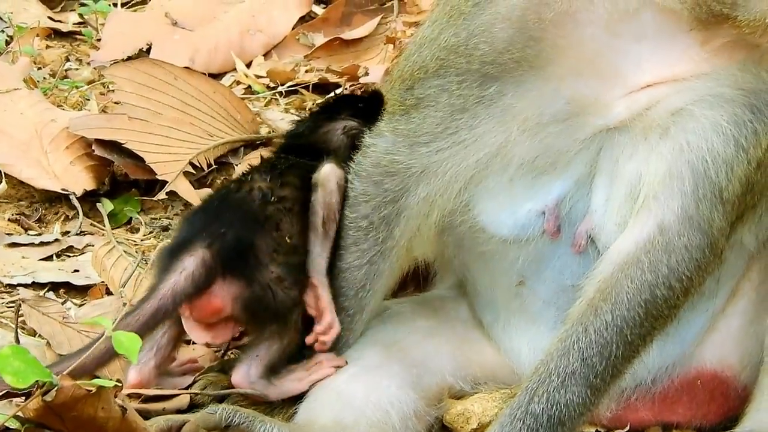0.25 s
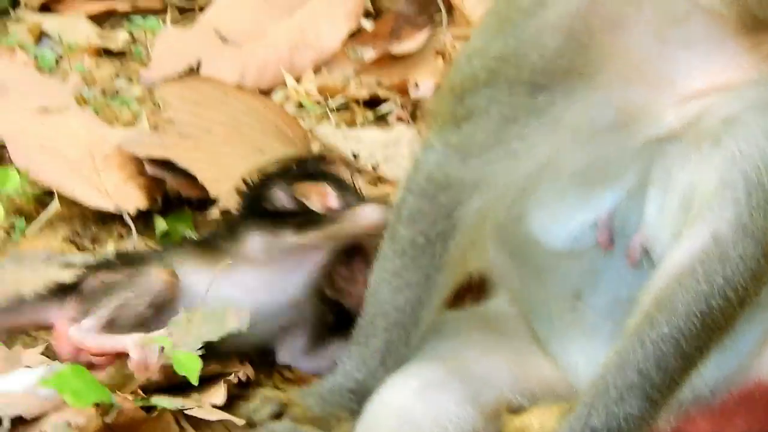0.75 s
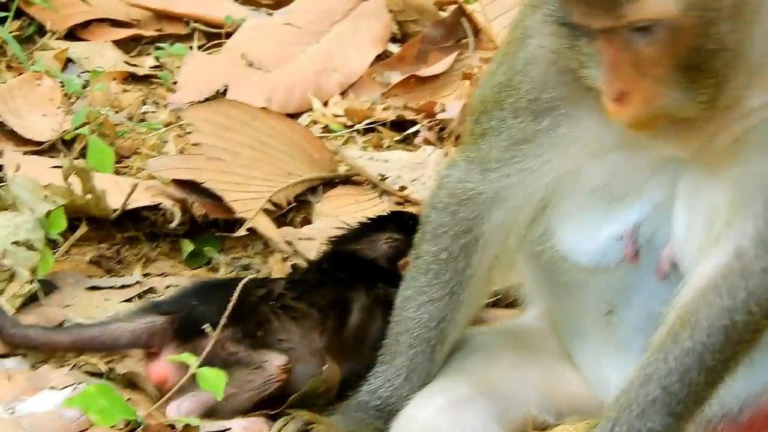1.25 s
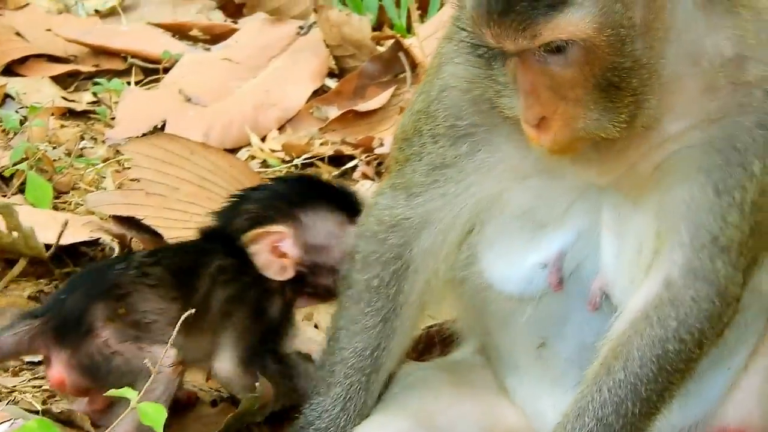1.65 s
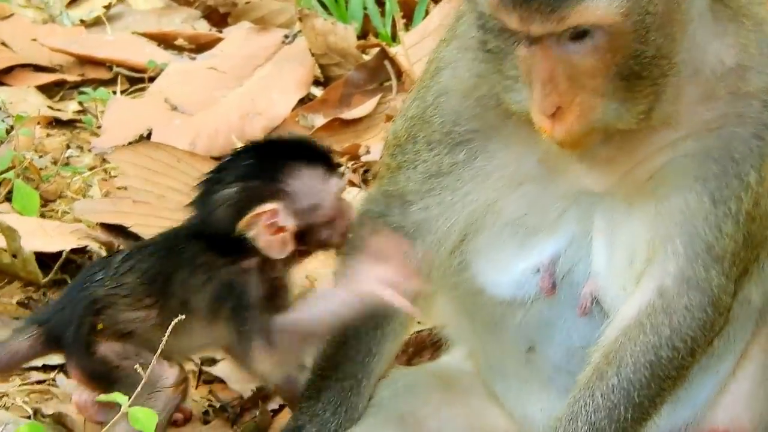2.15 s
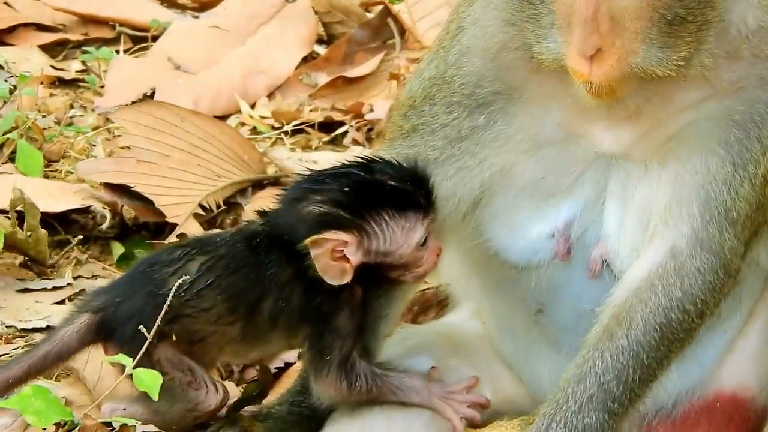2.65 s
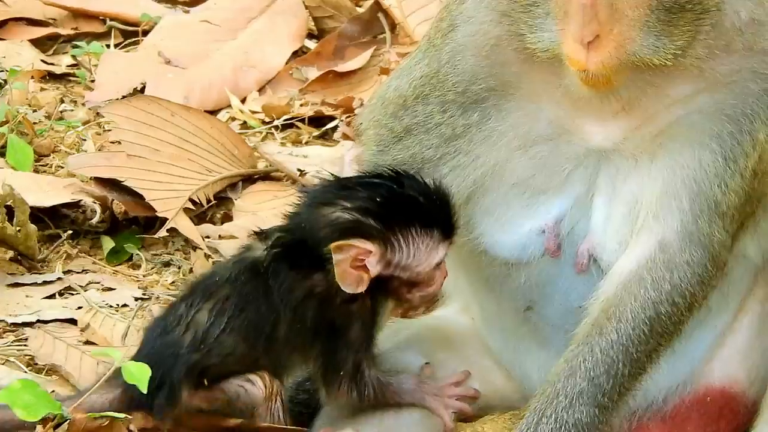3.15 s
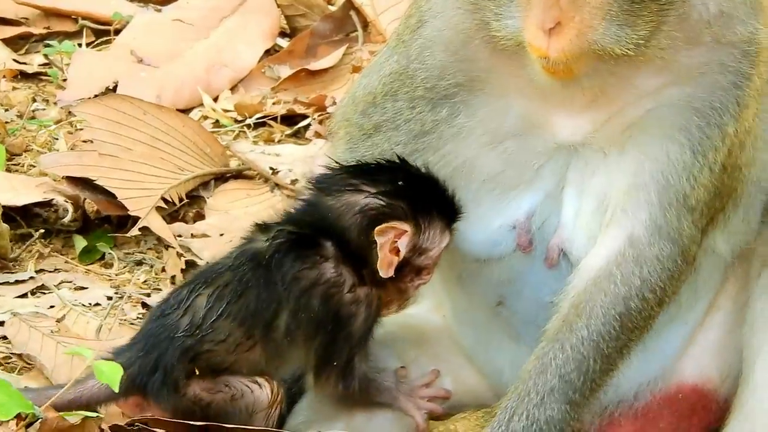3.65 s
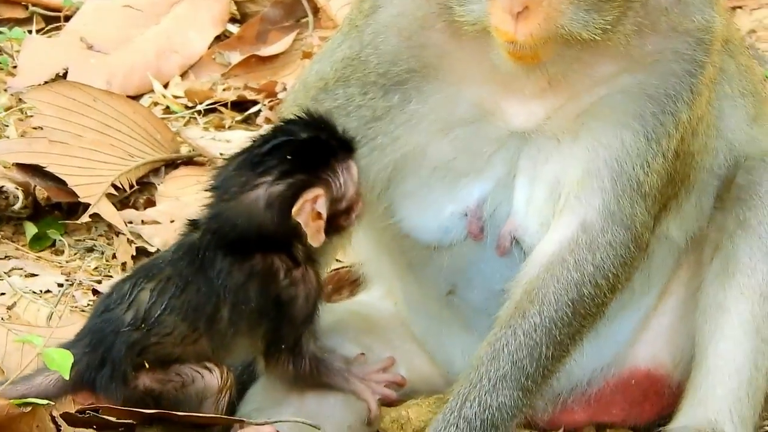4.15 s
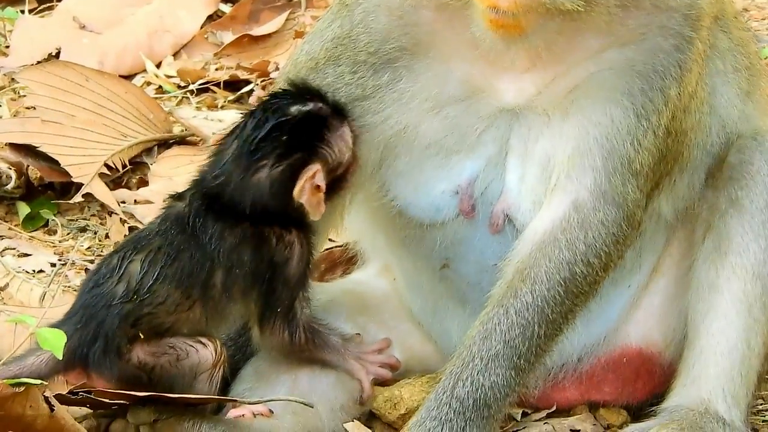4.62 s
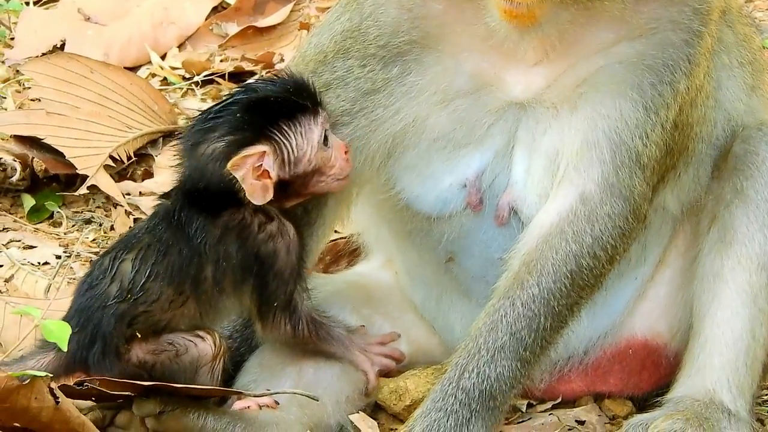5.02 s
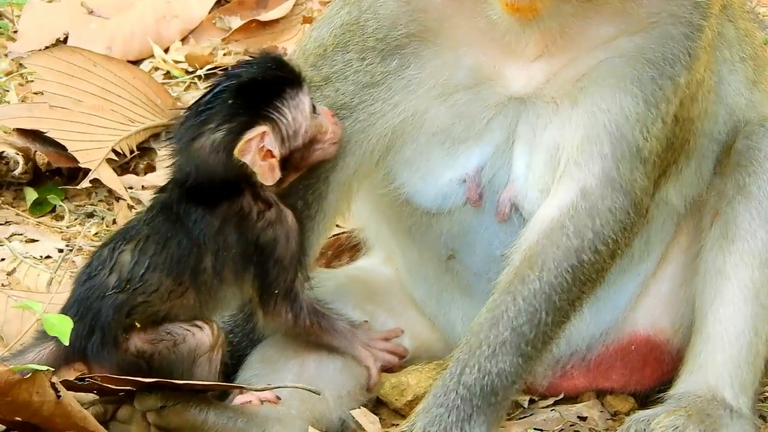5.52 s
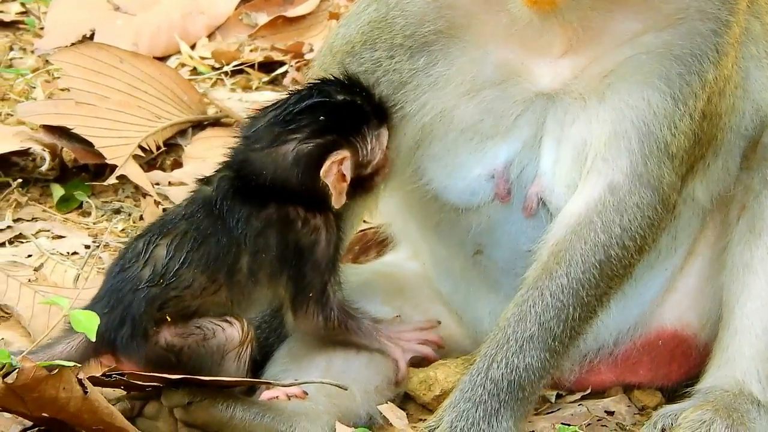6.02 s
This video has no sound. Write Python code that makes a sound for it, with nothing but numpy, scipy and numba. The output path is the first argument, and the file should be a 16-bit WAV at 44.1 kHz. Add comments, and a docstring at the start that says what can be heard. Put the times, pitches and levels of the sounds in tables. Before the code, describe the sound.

A baby monkey beside its mother squeals sharply, then whimpers in short hoarse notes, pausing and starting again several times. Dry leaves crunch early as it tumbles, rustle lightly later, and crackle most strongly near the end. A thin insect whistle wavers in the gaps, soft ticks run ten a second, and distant traffic hums. The cries are close and clear, with a short diffuse echo from surrounding trees.

```python
"""Baby monkey on dry leaves

A baby monkey squeals and whimpers: partials ring mouth and throat, forced breath screeches, trees smear each
cry. Leaves rustle and snap as clicks and noise bursts; a bird whistles and thin far tones hang as wavering
sines. A mechanism ticks as damped knocks; traffic hums as swelling bands of noise and drones as one low note."""
import sys
import numpy as np
from scipy import signal
from scipy.fft import rfft, irfft, next_fast_len
from scipy.io import wavfile
from scipy.ndimage import uniform_filter1d
from numba import njit

SR = 44100
rng = np.random.default_rng(int(sys.argv[2]) if len(sys.argv) > 2 else 0)


def transcribe(signal):
    """Save signal, clipped to [-1, 1], as a 16-bit WAV file at the path in sys.argv[1]."""
    frames = np.atleast_2d(signal).T
    limited = np.clip(frames, -1, 1)
    pcm = np.round(limited * 32767).astype(np.int16)
    wavfile.write(sys.argv[1], SR, pcm)


N = 276948


def undb(db):
    """Decibels to amplitude."""
    return 10 ** (np.asarray(db) / 20)


def unit(x):
    """Scale to an RMS of 1."""
    return x / np.sqrt(np.mean(x ** 2))


def track(rows, fade=0.0077):
    """Columns of a table as curves in time, and a gate that is open over its span."""
    s, *columns = np.transpose(rows)
    t = np.arange(N) / SR
    gate = np.clip(np.minimum(t - s[0], s[-1] - t) / fade, 0, 1)
    return [np.interp(t, s, c) for c in columns], gate


def walk(rate):
    """Random levels held 1 / rate s and slewed twice; spread near 1."""
    k = max(int(SR / rate), 2)
    held = np.repeat(rng.standard_normal(N // k + 1), k)
    return 1.236 * uniform_filter1d(uniform_filter1d(held, k), k)[:N]


def colour(x, points):
    """Shape the spectrum of x by (f/Hz, gain/dB) points."""
    hz, db = np.transpose(points)
    n = next_fast_len(N)
    log_hz = np.log(np.arange(n // 2 + 1) * SR / n + 1)
    return irfft(rfft(x, n) * undb(np.interp(log_hz, np.log(hz), db)), n)[..., :N]


def spread(mid, side, share):
    """Left and right from a shared and an opposed part."""
    return np.array([mid + share * side, mid - share * side])


@njit
def svf(x, hz, width):
    """State-variable band-pass, gain 1 at the centre."""
    y, b, l = np.empty(len(x)), 0., 0.
    g, k = np.tan(np.pi * hz / SR), width / hz
    for i in range(len(x)):
        v = (b + g * (x[i] + 1e-18 - l)) / (1 + g * (g + k))
        b, l, y[i] = 2 * v - b, l + 2 * g * v, k * v
    return y


def modes(x, table):
    """Parallel resonances of alternating sign, each applied twice for dark valleys."""
    out = 0
    for k, (hz, width, db) in enumerate(table):
        # two passes narrow the band, so each is half as wide again
        once = svf(x, 1. * hz, 1.5 * width)
        out = out + (-1) ** k * undb(db) * svf(once, 1. * hz, 1.5 * width)
    return out


def baby():
    """Vocal folds give a stack of partials that rings mouth and throat; forced breath screeches over it."""
    # throat resonances, the high ones opening with the mouth: f/Hz, width/Hz, level/dB
    low_throat = [(1750, 600, -24), (2480, 440, -7), (3450, 450, -12)]
    high_throat = [(4300, 500, -7), (5300, 600, -4), (6800, 600, 2), (7700, 400, -7), (8700, 800, -10)]
    # colour of breath forced through the open throat: f/Hz, gain/dB
    breath_colour = [(290, -54), (500, -97), (840, -27), (1510, -5), (1680, -2.5), (2070, -2), (2400, 3.5),
                     (2950, -2), (3400, -1), (4000, -1.5), (4800, 1), (5550, -5), (6680, -3), (9450, -7.5),
                     (12000, -149), (15600, -91), (22000, -120)]
    hz, mouth_hz, (lower, upper, screech) = cries()
    # tight folds whistle clean; as the pitch drops they slacken and turn hoarse, less so below 900 Hz
    hoarse = np.clip((1350 - hz) / 90, .2, 1.4) / (1 + .4 * (hz < 900))
    # low cries with little forced breath stay clearer
    hoarse = hoarse * np.clip(2.5 * screech / (lower + 1e-9) + (hz > 900), .3, 1)
    jitter = hoarse * (.011 * walk(250) + .008 * walk(45))
    phase = 2 * np.pi * np.cumsum(hz * (1 + jitter)) / SR
    folds = mouth = breath = rasp = 0
    for k in range(1, 14):
        # the higher a partial, the more the uneven cycles blur it
        blur = (hoarse + .4 * (hz < 950)) * (k * hz / 4800) ** 2 * walk(300)
        size = (1 + .8 * hoarse * walk(170)) * (k * hz < 10000)
        off_mouth = k * hz - mouth_hz
        folds = folds + size * np.cos(k * phase + blur)
        mouth = mouth + size * np.cos(k * phase) / (1 + (off_mouth / 300) ** 2) ** 2
        # ragged breath makes a wide band at each partial
        puff = np.cos(k * phase) * walk(700)
        breath = breath + puff
        rasp = rasp + puff / (1 + (off_mouth / 400) ** 2)
    breath = unit(breath) + .95 * rng.standard_normal(N)
    forced = unit(colour(breath, breath_colour))
    throat = unit(modes(breath, low_throat + high_throat))
    breath = unit(forced + .8 * throat + .25 * unit(rasp)) * undb(1.5 * walk(250))
    voice = mouth * lower + modes(folds * lower, low_throat) + modes(folds * upper, high_throat)
    return undb(-5.5) * voice, breath * screech


def cries():
    """Pitch, mouth resonance and three levels: cries climb to a peak, slide in pitch and fade."""
    # one row a cry; it may end before its peak: start t/s, peak t/s, end t/s, first f/Hz, last f/Hz,
    # first mouth f/Hz, last mouth f/Hz, lower drive/dB, upper drive/dB, screech level/dB, basic fade/(dB/s)
    calls = [ (0.052, 0.113, 0.29, 1422, 950, 3920, 1950, -37.5, -27, -43.5, 139),
             (0.288, 0.346, 0.36, 906, 812.4, 3500, 3240, -32.5, -42, -47, 16),
             (0.355, 0.357, 0.41, 820, 807, 2480, 2420, -31, -36, -48, 46),
             (0.402, 0.412, 0.42, 775, 734.4, 2360, 2200, -33, -39, -50, 140),
             (0.451, 0.467, 0.53, 846, 826, 3550, 2440, -45.5, -63, -53, 51),
             (0.537, 0.556, 0.55, 743, 731, 2230, 2200, -44, -75, -55.5, 64),
             (0.594, .62, 0.655, 807.8, 822, 2420, 2470, -42, -69, -54.5, 67),
             (1.037, 1.104, 1.267, 873, 840, 2600, 2570, -55.5, -90, -65.5, 40.3),
             (1.34, 1.391, 1.49, 821, 783, 2440, 2360, -35, -60, -44, 28),
             (1.614, 1.629, 1.75, 774, 758, 2300, 2270, -38, -71, -60, 120),
             (1.642, 1.711, 1.725, 716, 743.4, 2140, 2260, -42, -72, -61, 28),
             (2.413, 2.469, 2.517, 1416, 970.3, 3748, 2091, -32.5, -27.5, -31.5, 183),
             (2.517, 2.543, 2.67, 846, 797, 2440, 2400, -30, -30.5, -39.5, 104),
             (2.701, 2.74, 2.792, 893, 819, 3562, 3300, -36, -46, -45, 40),
             (2.794, 2.815, 2.858, 768, 714.7, 2315, 2150, -35, -52, -49, 90),
             (2.86, 2.872, 2.93, 810, 785, 3250, 3150, -46, -60, -55, 113),
             (3.65, 3.734, 3.74, 1383, 1053, 3740, 2150, -37, -24, -33.5, 340),
             (3.771, 3.793, 4.03, 772.7, 770, 2470, 2323, -31, -44, -40, 270),
             (3.983, 4, 4.095, 803, 790, 2440, 2380, -37, -42, -46.5, 120),
             (4.102, 4.125, 4.24, 800.5, 781, 2400, 2365, -44.5, -67, -54.5, 200),
             (4.179, 4.232, 4.26, 780, 784, 2360, 2348, -52.5, -73.5, -70, 40),
             (4.966, 5.004, 5.03, 770, 817.4, 2380, 2450, -33.5, -63.5, -46, 125),
             (5.054, 5.111, 5.13, 776.6, 732, 2420, 2208, -35.5, -65, -53, 40),
             (5.167, 5.192, 5.222, 749, 739, 2262, 2228, -53, -68.5, -52, 130),
             (5.222, 5.289, 5.44, 830, 823, 3080, 3323, -41, -55, -56.5, 152),
             (5.347, 5.383, 5.62, 768, 751.6, 2300, 2270, -48, -72.5, -57.5, 71),
             (5.461, 5.5, 5.57, 1424, 1090, 4240, 3310, -40, -42, -44, 59),
             (5.535, 5.631, 5.8, 906, 984, 2704, 2952, -45, -46, -47.5, 150), ]
    tight_hz = 1200  # cries that start above this are squeals, the rest whimpers
    pause_s = .035
    # for lower, upper and screech: start below peak/dB after a pause, and straight after another cry
    rested_climb_db, running_climb_db = (22.5, 26.5, 37), (9.5, 2, 5)
    # for the same three: delay of the peak/s, and factor on the fade
    late_s, fade_share = (0.0005, 0.0078, 0.0204), (1.23, 1.54, 0.81)
    sag_share, sag_s, break_s, break_late_s = .49, .13, 0.0202, .015
    jaw_late_s, jaw_s = 0.013, 0.0046

    def step(u, late, width):
        return .5 + .5 * np.tanh((u - late) / width)

    t = np.arange(N) / SR
    hz, mouth_hz, gains = np.full(N, 1000.), np.full(N, 2300.), np.zeros((3, N))
    quiet_from = 0
    for call, following in zip(calls, calls[1:] + [(N,)]):
        start, peak, end, first_hz, last_hz, open_hz, shut_hz, *peak_db, fade = call
        # a cry lasts until the next when that follows at once or cuts in
        end = following[0] if following[0] - end < pause_s else end
        on = slice(int(start * SR), int(end * SR))
        u = t[on] - peak
        # a whimper slides evenly
        pitch = jaw = (t[on] - start) / (end - start)
        if first_hz > tight_hz:
            # a squeal sags a little, then pitch and mouth break downward around the peak
            sag = np.minimum((t[on] - start) / sag_s, 1)
            pitch = sag_share * sag + (1 - sag_share) * step(u, break_late_s, break_s)
            jaw = step(u, jaw_late_s, jaw_s)
        hz[on] = first_hz + (last_hz - first_hz) * pitch
        mouth_hz[on] = open_hz + (shut_hz - open_hz) * jaw
        climbs = rested_climb_db if start - quiet_from > pause_s else running_climb_db
        quiet_from = end
        for gain, db, climb, share, late in zip(gains, peak_db, climbs, fade_share, late_s):
            rising = climb / (peak + late - start) * (u - late)
            falling = -share * fade * (u - late)
            gain[on] = undb(db + np.minimum(rising, falling))
    return hz, mouth_hz, uniform_filter1d(gains, int(.008 * SR))


def shrill():
    """A throat resonance rung by ragged breath: a falling sine whose strength varies fast at random."""
    # rows that end before they start stay silent:
    # start t/s, peak t/s, end t/s, first f/Hz, last f/Hz, peak level/dB
    shrill_bands = [(0.103, .125, .27, 7080, 6650, -43), (1.391, 1.439, 1.6, 8910, 8800, -55.5),
                    (2.492, 2.537, 2.3, 6746, 6520, -36.5), (2.7, 2.73, 2.8, 7904, 7504, -44.5),
                    (1.374, 1.41, 1.55, 3452, 3300, -50), (1.385, 1.41, 1.6, 4940, 4700, -50),
                    (2.711, 2.745, 2.6, 3550, 3203, -45)]
    rise_db, fade_db_per_s = 4, 68
    out = 0
    for start, peak, end, first_hz, last_hz, top_db in shrill_bands:
        (hz,), gate = track([(start, first_hz), (end, last_hz)])
        (db,), _ = track([(start, top_db - rise_db), (peak, top_db),
                          (end, top_db - fade_db_per_s * (end - peak))])
        out = out + gate * undb(db) * walk(600) * np.sin(2 * np.pi * np.cumsum(hz) / SR)
    return out


def leaves():
    """Dry leaves rub: dense clicks of very uneven size over a dry hiss, coloured alike."""
    # colour of the leaves: f/Hz, gain/dB
    leaf_colour = [(410, -40), (700, -39), (807, -20), (919, -59), (1010, -15.5), (2190, -15.5),
                   (3410, -10.5), (3930, -14), (8560, 2.5), (9620, 1.5), (15600, -39)]
    patchy = undb(1.86 * walk(40) + 0.56 * walk(250))
    pair = []
    for _ in range(2):
        sizes = undb(np.minimum(18.0 * rng.exponential(size=N), 14))
        cracks = (rng.random(N) < .02) * rng.standard_normal(N) * sizes
        hiss = 1.25 * rng.standard_normal(N)
        pair.append(unit(colour(unit(cracks) + hiss, leaf_colour)))
    left, right = spread(*pair, 0.86) * patchy * scuffles()
    # the last scuffles are off to the left: from 5.45 s the right side comes a sample late
    return np.array([left, np.where(np.arange(N) > 5.45 * SR, np.roll(right, 1), right)])


def scuffles():
    """Level of the rustle: each scuffle rises at its own pace, holds, and settles."""
    # movements in the leaves: full from t/s, held t/s, rise/(dB/s), level/dB
    moves = [(0.422, .01, 183, -58), (.6, 0.024, 302, -56), (0.652, 0.0045, 223, -38.5),
             (0.718, 0.04, 399, -38.5), (1.191, 0.0071, 79, -64.5), (1.78, 0.0027, 117, -60),
             (2.062, 0.0059, 62, -65.5), (2.31, 0.046, 96, -68.5), (2.469, 0.0087, 116, -54),
             (2.91, 0.023, 121, -61), (3.13, 0.0075, 153, -75), (3.29, 0.0032, 501, -52.5),
             (3.428, 0.085, 256.5, -50), (3.67, 0.019, 202, -65), (3.74, 0.26, 208, -43),
             (4.101, 0.15, 96, -60), (4.345, 0.033, 495, -56.5), (4.42, 0.039, 301.5, -52),
             (4.49, 0.022, 300, -52), (4.548, 0.0086, 600, -48), (4.59, 0.065, 150, -52.5),
             (4.95, 0.037, 39, -54), (5.369, 0.013, 48, -53.5), (5.49, 0.012, 510.5, -46.5),
             (5.62, 0.14, 594, -32.5), (5.9, 0.18, 98, -60.5)]
    settle_db_per_s, still_db = 167, -80.5
    t = np.arange(N) / SR
    power = undb(still_db) ** 2
    for s, held, rise, db in moves:
        slope = np.minimum(rise * (t - s), -settle_db_per_s * (t - s - held))
        power = power + undb(db + np.minimum(0, slope)) ** 2
    return np.sqrt(power)


def snaps():
    """Single leaves break: a few milliseconds of noise around their own pitch."""
    # leaf snaps: t/s, peak level of the shared part/dB, centre f/Hz
    breaks = [(0.651, -15, 8170), (0.66, -20.5, 9060), (0.7074, -21, 8800), (0.7276, -20.5, 8260),
              (0.7537, -39, 8800), (0.787, -35, 8600), (2.9093, -38, 8100), (3.137, -54.5, 10600),
              (4.3305, -37.5, 9900), (4.428, -44, 8500), (4.447, -35, 8200), (4.486, -30.5, 7960),
              (4.496, -36, 7660), (4.532, -24, 8050), (4.543, -22.5, 8140), (4.585, -32, 8140),
              (4.709, -39.5, 7000), (4.881, -41, 6900), (4.987, -41, 8160), (5.7366, -28.5, 8900),
              (5.76, -39, 9690), (5.7806, -34, 8880), (5.7928, -31.5, 8950), (5.806, -28, 7550),
              (5.826, -29.5, 9060)]
    out = np.zeros((2, N))
    t = np.arange(1024) / SR
    envelope = np.exp(-t / .0012) * np.minimum(t / .0002, 1)
    for (s, db, hz), burst in zip(breaks, rng.standard_normal((len(breaks), 2, 1024))):
        ring = np.array([svf(svf(b * envelope, 1. * hz, .3 * hz), 1. * hz, .3 * hz) for b in burst])
        i = int(s * SR)
        out[:, i:i + 1024] += spread(*ring, 0.74) / np.abs(ring[0]).max() * undb(db)
    return out


def bird():
    """A near sine that beats unevenly, with a faint octave."""
    # whistles: start t/s, peak t/s, end t/s, first f/Hz, last f/Hz, relative level/dB
    whistles = [(1.277, 1.358, 1.59, 4494, 4610, -53), (1.747, 1.787, 1.83, 4695, 4763, -50.5),
                (1.851, 2.074, 2.4, 4674, 4634, -54.5), (2.852, 2.915, 3.19, 4750, 4690, -51),
                (3.169, 3.237, 3.45, 4620, 4568, -61)]
    rise_db, fade_db_per_s = 12.5, 105
    out = 0
    for start, peak, end, first_hz, last_hz, top_db in whistles:
        (hz,), gate = track([(start, first_hz), (end, last_hz)], fade=0.016)
        (db,), _ = track([(start, top_db - rise_db), (peak, top_db),
                          (end, top_db - fade_db_per_s * (end - peak))])
        waver = 0.00293 * walk(150) + .004 * walk(25)
        phase = 2 * np.pi * np.cumsum(hz * (1 + waver)) / SR
        beat = 0.79 + 0.79 * walk(200)
        out = out + gate * undb(db + 4.0) * beat * (np.sin(phase) + undb(-22.0) * np.sin(2 * phase))
    return out


def tones():
    """Thin far tones of fixed pitch, each fluttering alone in strength and phase under a shared swell."""
    # the tones: f/Hz, relative level/dB
    thin_tones = [(3862, -10), (4108, -4), (5812, -7), (6075, -3), (8240, -5), (8670, -4)]
    # their shared swell: t/s, level/dB
    tone_swell = [(3.45, -58), (3.55, -55), (3.7, -58.5), (3.76, -30.5), (3.87, -33), (4.01, -43),
                  (4.2, -57), (4.32, -68), (4.45, -57.5), (4.72, -62), (4.77, -71), (4.9, -54.5),
                  (5.0, -69)]
    (db,), gate = track(tone_swell, fade=0.049)
    t = np.arange(N) / SR
    out = 0
    for hz, tone_db in thin_tones:
        flutter = undb(tone_db - 5 + 1.5 * walk(22)) * walk(120)
        out = out + flutter * np.sin(2 * np.pi * hz * t + 2.5 * walk(90))
    return gate * undb(db) * out


def ticks():
    """A small mechanism knocks softly ten times a second and twice loses its step."""
    # runs of even ticking: first t/s, last t/s, middle blow level/dB
    runs = [(0.047, 2.1, -37), (2.214, 2.95, -33), (3.085, 6.25, -30.5)]
    # resonances of its body: f/Hz, width/Hz, level/dB
    body = [(870, 51, -0.5), (1410, 610, -8.5)]
    knocks = np.zeros(N)
    for first, last, db in runs:
        at = (np.arange(first, last, .1) * SR).astype(int)
        knocks[at] = undb(db + 3 * rng.standard_normal(len(at)))
    soft = np.convolve(knocks, np.hanning(40))[:N]  # each blow lasts about a millisecond
    return modes(soft, body)


@njit
def trees(x, lags, gain, damp):
    """Trees scatter sound: eight delay lines that feed each other, duller on every round."""
    line, soft, out = np.zeros((8, 4096)), np.zeros(8), np.zeros((2, len(x)))
    for i in range(len(x)):
        total = 0.
        for k in range(8):
            soft[k] += (1 - damp) * (gain[k] * line[k, (i - lags[k]) & 4095] - soft[k])
            total += soft[k]
            out[k % 2, i] += soft[k]
        for k in range(8):
            line[k, i & 4095] = x[i] + 1e-18 + soft[k] - total / 4
    return out


def air():
    """Traffic hum and air as half-octave noise bands; hum and middle swell apart, every band flickers."""
    # colour of the background: f/Hz, gain/dB
    air_colour = [(15, -45), (38, -14), (160, 3), (204, -1.5), (274, -12.5), (434, -17), (873, -8.5),
                  (1170, -4), (3840, -28), (4390, -16), (6570, -66), (9080, -48), (10700, -69),
                  (11600, -29), (15600, -36.5)]
    # swells, heard relative to their means: t/s, hum level/dB, middle level/dB
    gusts = [(0.0, -68, -71), (0.38, -69.5, -71), (1.78, -70, -68.5), (1.85, -63, -68), (2.36, -68.5, -66),
             (2.52, -68, -66.5), (3.01, -70.5, -66.5), (3.27, -61, -65.5), (3.88, -65.5, -61),
             (4.13, -71, -62), (4.65, -60, -61), (4.67, -67, -62), (5.21, -66.5, -63), (5.44, -56.5, -66),
             (5.54, -71.5, -61), (5.75, -58.5, -55.5), (5.96, -68, -63), (6.28, -53.5, -63.5)]
    (hum_db, middle_db), _ = track(gusts)
    out = 0
    for hz in 30 * 2 ** np.arange(0, 9.1, .5):
        mid, side = (svf(svf(rng.standard_normal(N), hz, hz / 2), hz, hz / 2) for _ in range(2))
        # bands from 2500 Hz up do not swell
        swell = hum_db - hum_db.mean() if hz < 350 else (middle_db - middle_db.mean()) * (hz < 2500)
        flicker = 2.34 * walk(5.297) + (1.5 if hz < 350 else 4.) * walk(30)
        width = np.clip(0.11 + 0.093 * np.log2(hz / 125), .17, .9)  # higher bands are wider
        out = out + undb(swell + flicker) * spread(mid, side, width)
    return unit(colour(out, air_colour)) * undb(-59)


def drone():
    """A low note, wavering in pitch and strength, that slowly fades."""
    (db,), gate = track([(3.033, -62), (4.08, -66)], fade=0.097)  # t/s, level/dB
    hz = 194.5 * (1 + 0.0298 * walk(3.5))
    return gate * undb(db) * (0.82 + walk(25.0)) * np.sin(2 * np.pi * np.cumsum(hz) / SR)


def scene():
    """Cries, bird whistles and tones sound direct and through the trees; the rest is added dry."""
    t60_s, damp, echo_db = 0.51, 0.2, -2
    voice_echo_db = -8  # the voiced part beams forward and scatters less than the breath
    voice, breath = baby()
    far = breath + shrill() + bird() + tones()
    lags = rng.integers(500, 3000, 8)  # samples
    echo = trees(far + undb(voice_echo_db) * voice, lags, undb(-60 * lags / SR / t60_s), damp)
    echo = spread(echo.mean(axis=0), (echo[0] - echo[1]) / 2, 0.88)
    return voice + far + undb(echo_db) * echo + leaves() + snaps() + ticks() + air() + drone()


def record(dry):
    """A steep low-pass cuts the top above 15.7 kHz."""
    return signal.sosfilt(signal.ellip(10, .2, 70, 15700, fs=SR, output="sos"), dry)


dry = scene()
out = record(dry)
transcribe(out)
```